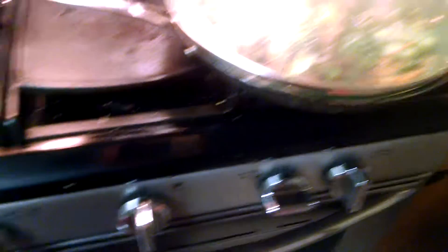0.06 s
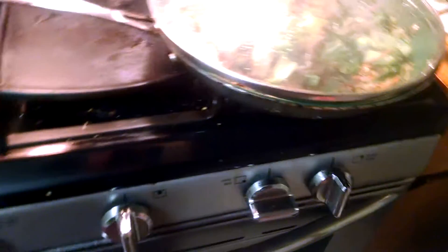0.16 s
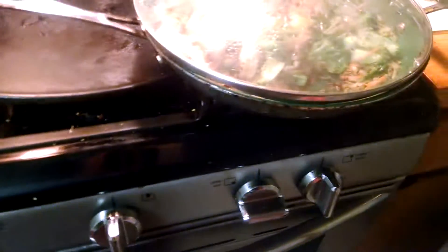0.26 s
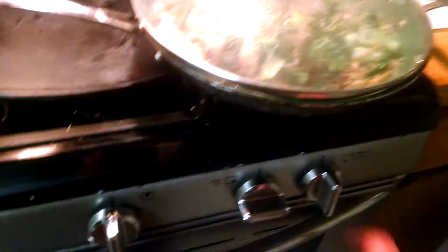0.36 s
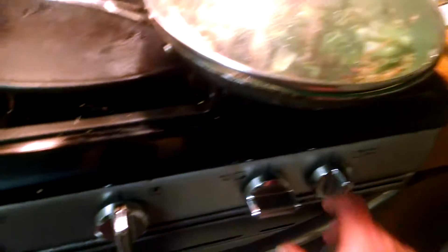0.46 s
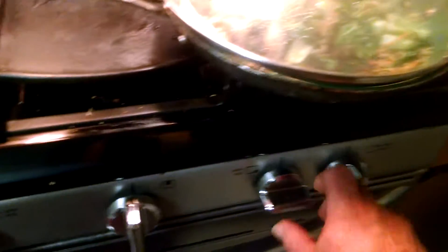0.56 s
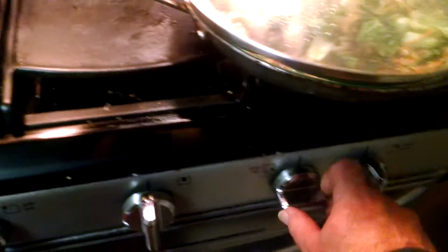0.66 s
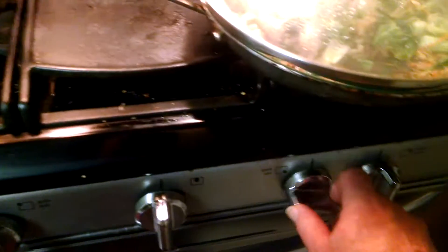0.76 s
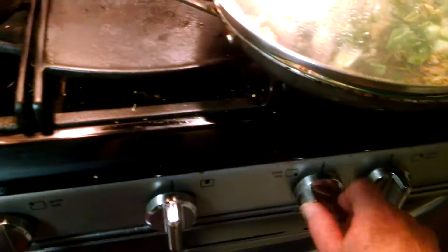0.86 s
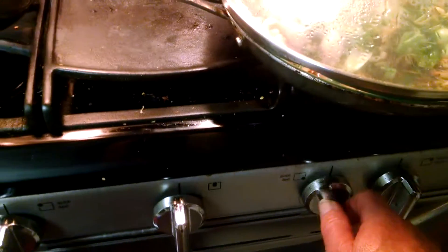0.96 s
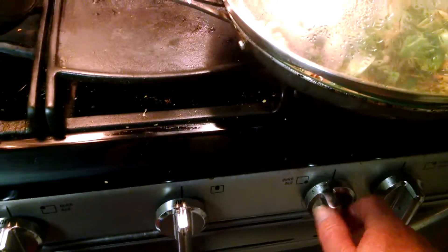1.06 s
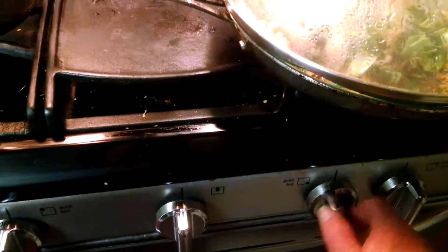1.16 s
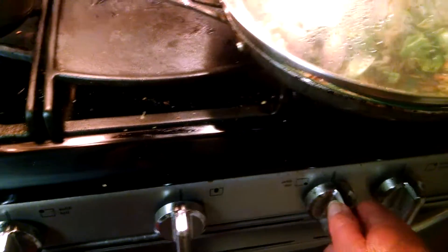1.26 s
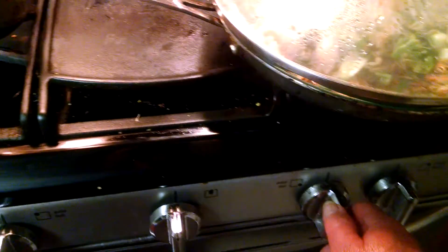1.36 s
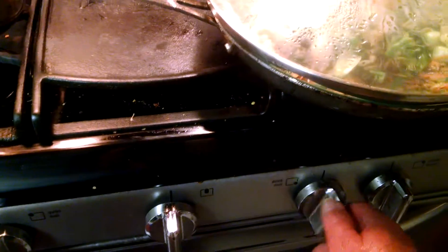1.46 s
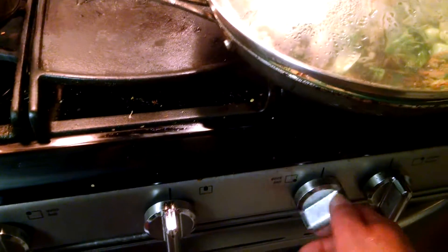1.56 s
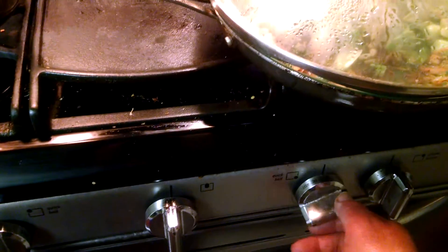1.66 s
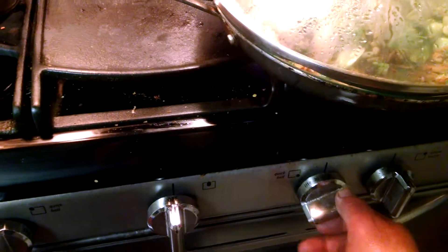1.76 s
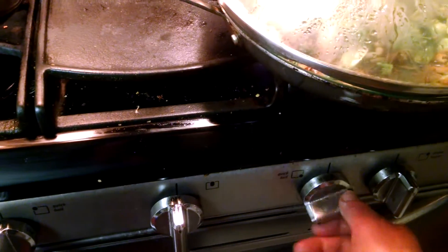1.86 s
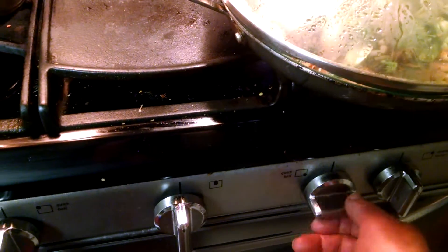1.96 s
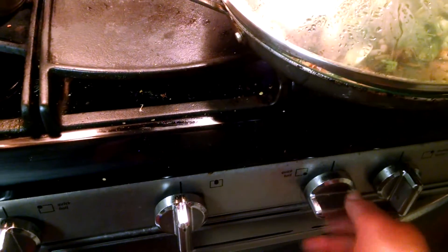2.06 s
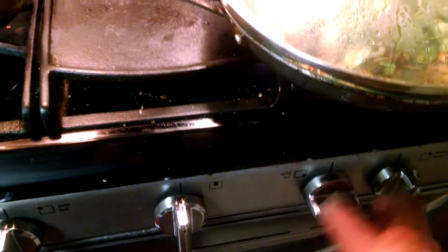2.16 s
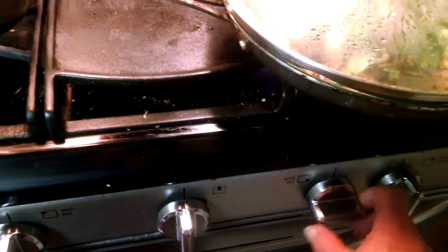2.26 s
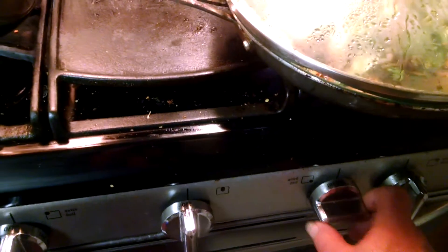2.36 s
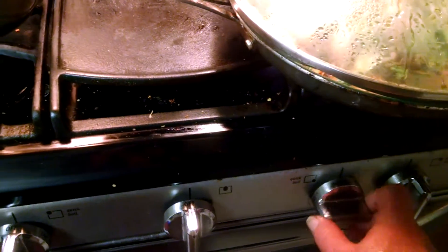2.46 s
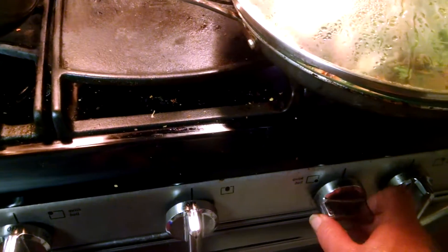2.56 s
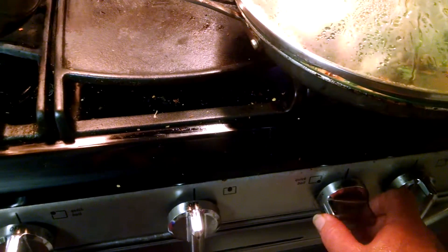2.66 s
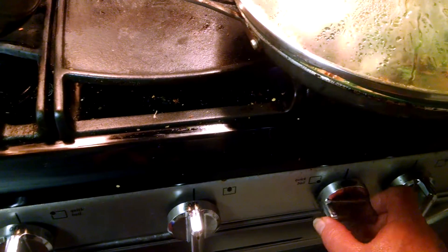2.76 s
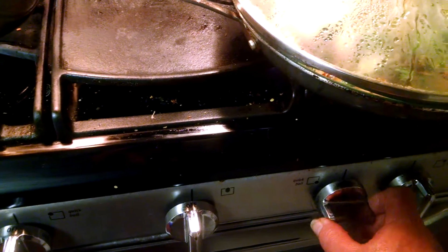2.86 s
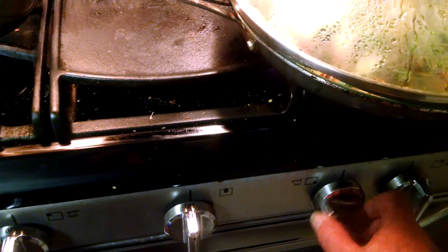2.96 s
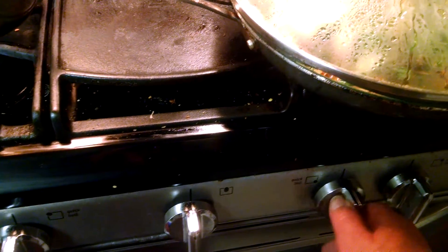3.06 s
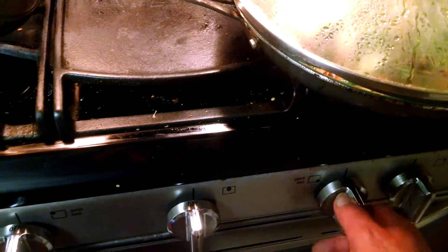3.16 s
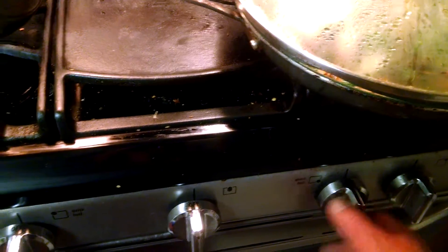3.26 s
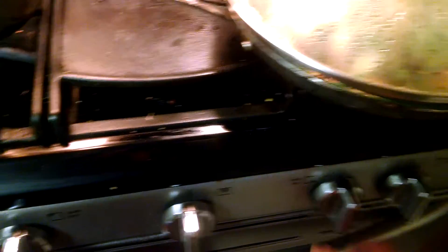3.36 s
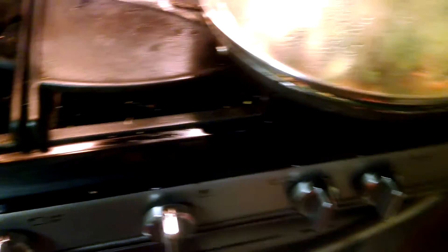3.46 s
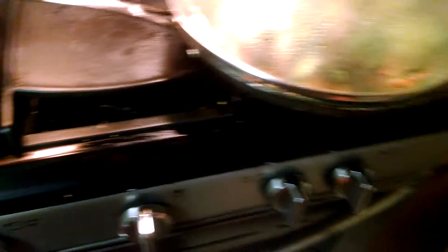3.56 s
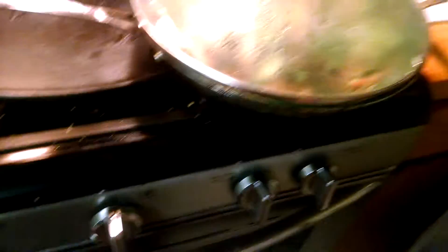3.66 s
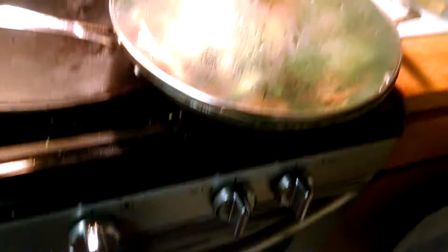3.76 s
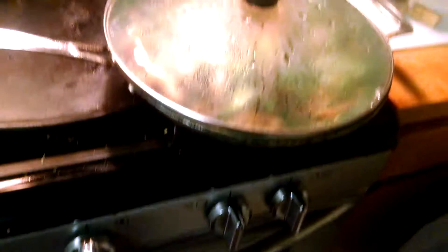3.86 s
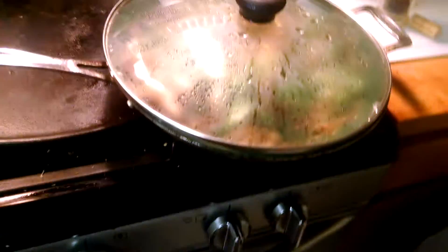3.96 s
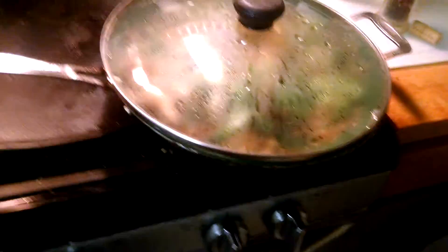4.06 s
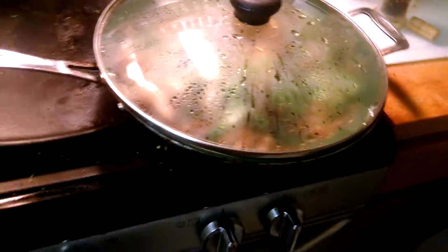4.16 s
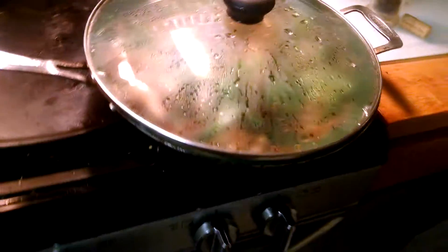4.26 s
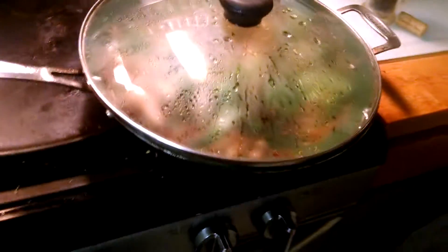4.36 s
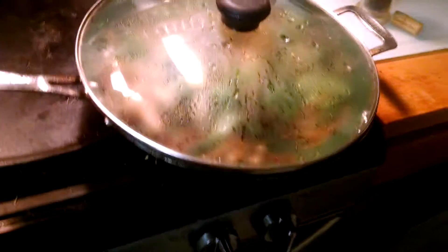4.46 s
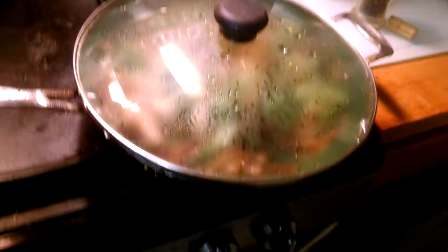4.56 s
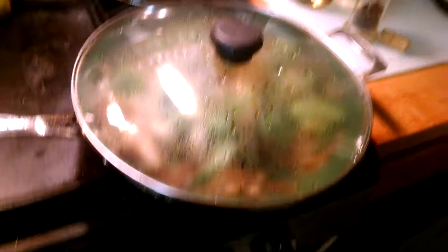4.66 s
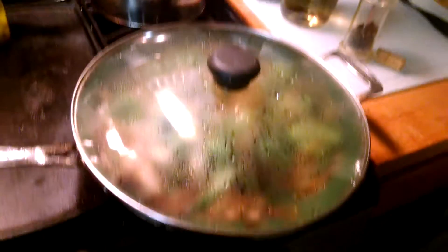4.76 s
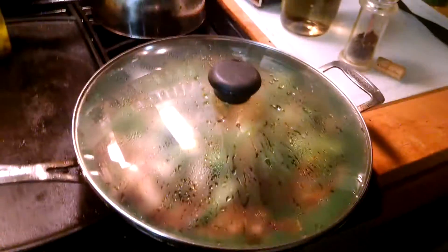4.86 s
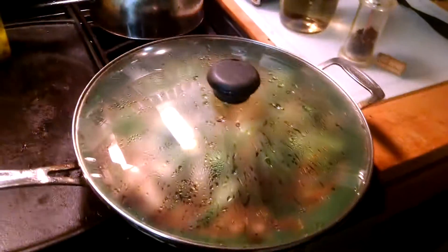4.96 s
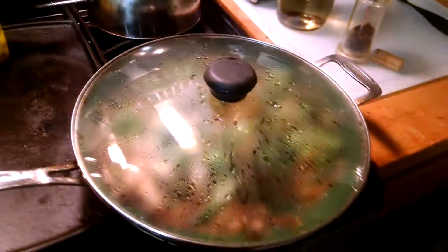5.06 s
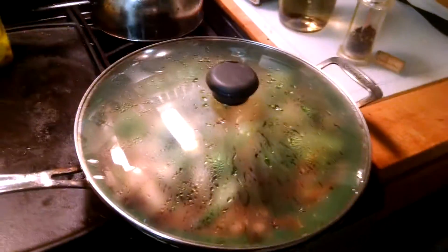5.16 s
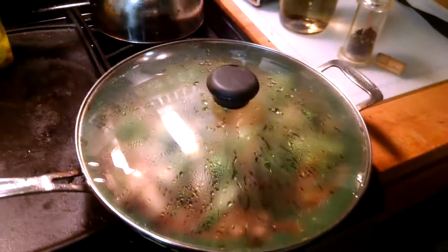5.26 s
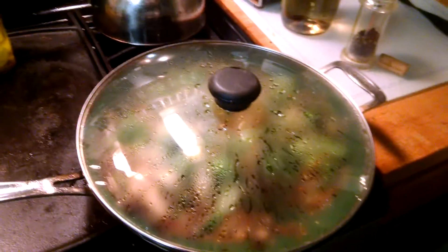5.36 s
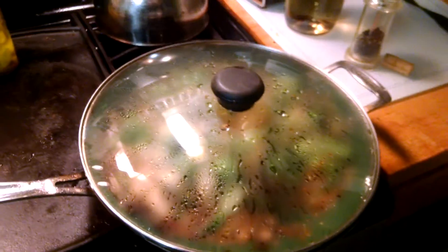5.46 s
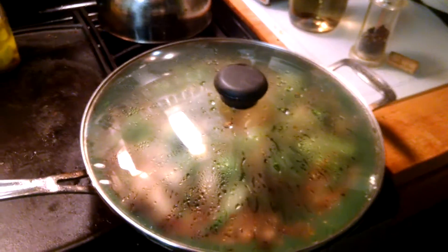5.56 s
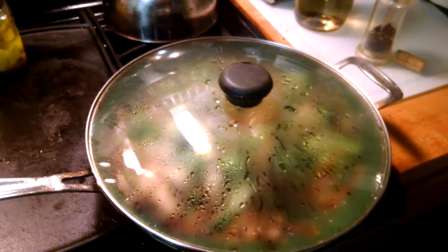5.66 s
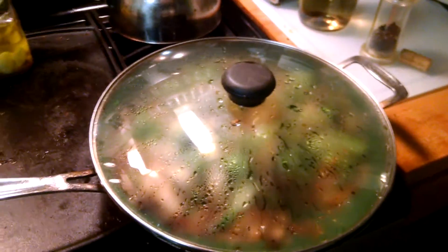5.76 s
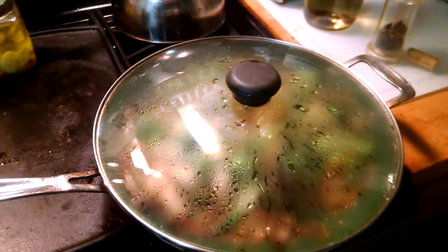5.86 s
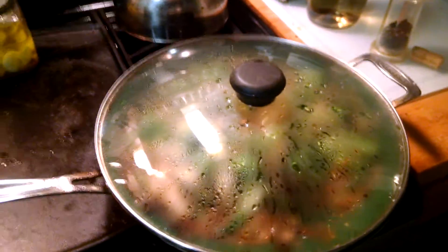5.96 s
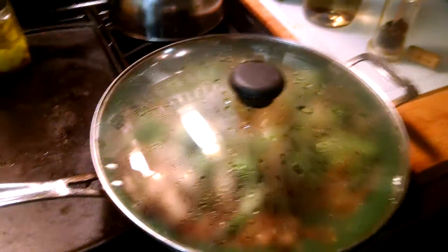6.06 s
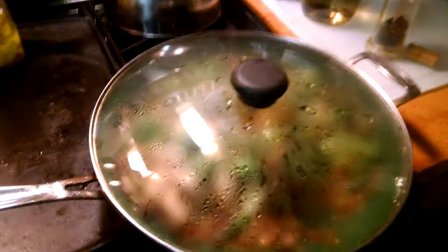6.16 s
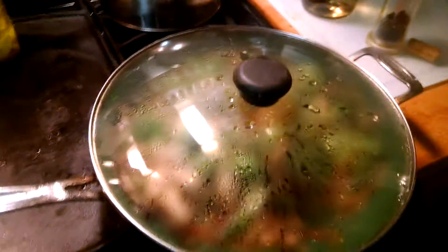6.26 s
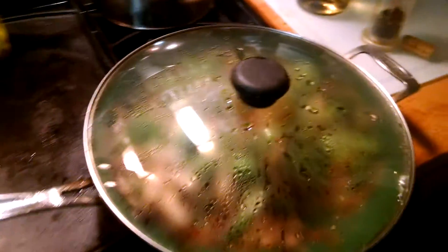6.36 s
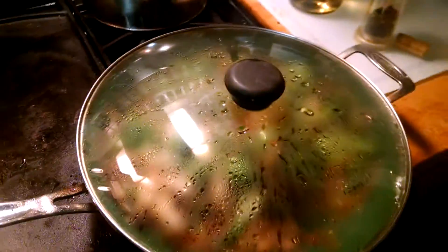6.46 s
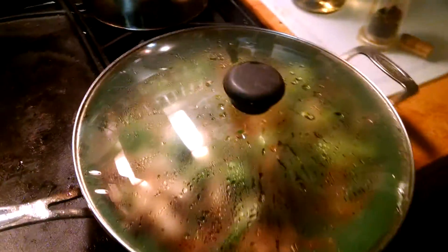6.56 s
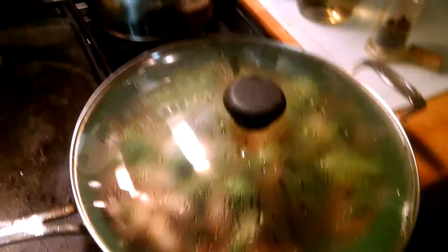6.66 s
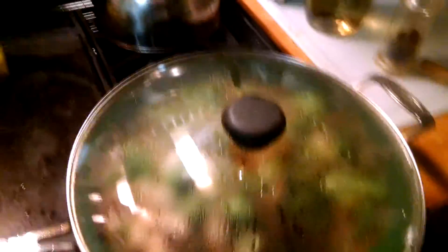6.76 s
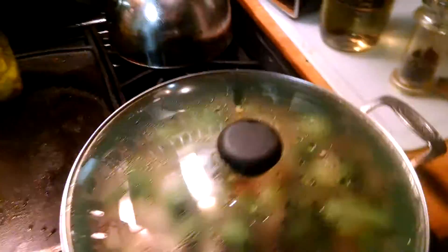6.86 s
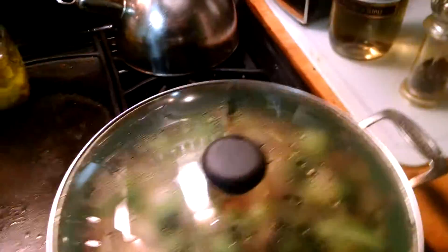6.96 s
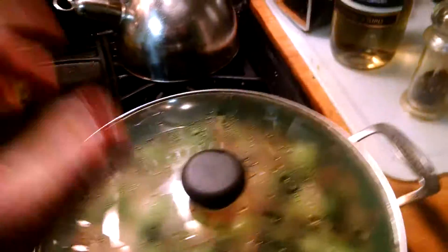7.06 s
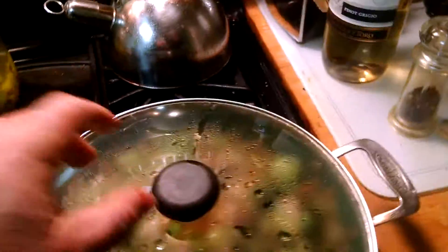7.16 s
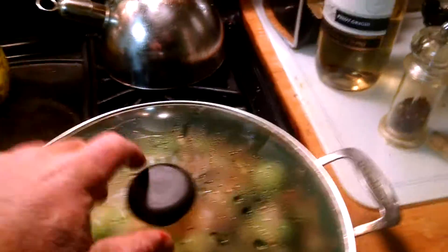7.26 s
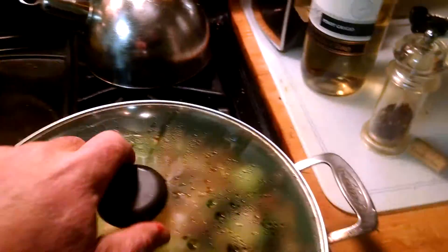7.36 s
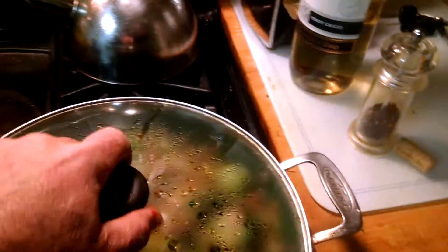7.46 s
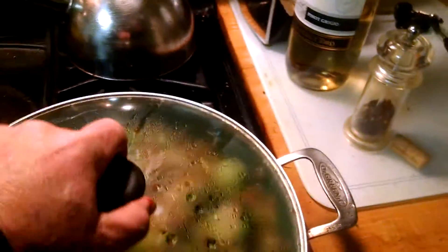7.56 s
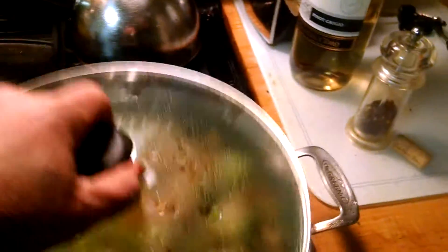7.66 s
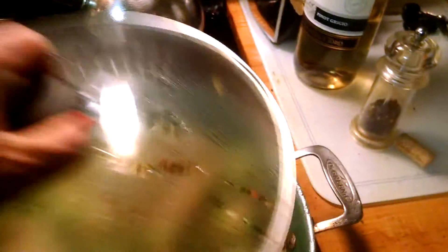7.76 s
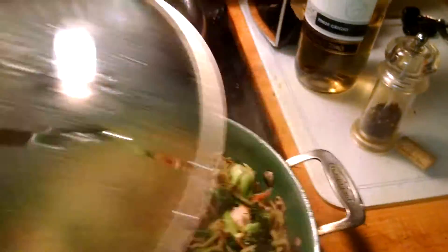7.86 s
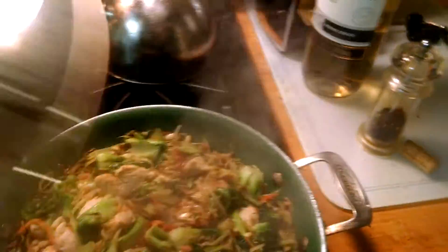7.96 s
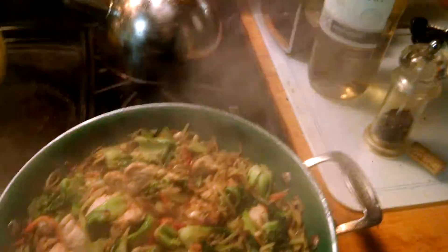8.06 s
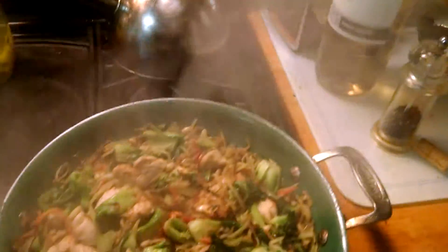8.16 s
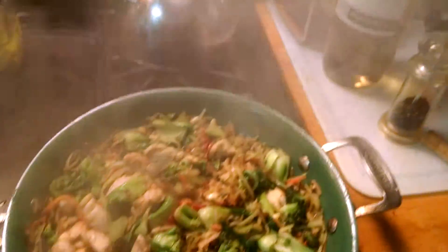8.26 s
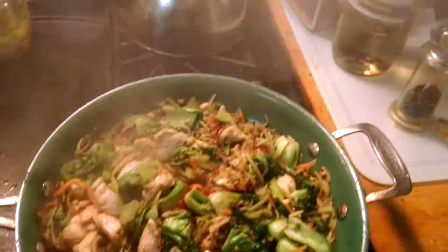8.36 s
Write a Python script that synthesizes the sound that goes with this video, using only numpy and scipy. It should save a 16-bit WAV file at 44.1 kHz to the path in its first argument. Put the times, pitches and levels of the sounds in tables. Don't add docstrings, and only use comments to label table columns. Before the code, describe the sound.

A close, handheld stereo microphone in a kitchen hears vegetables frying under a glass lid: a dense, fine, slightly muffled hiss with small crackles and occasional bright spits. Beneath it a steady low motor hum wavers slightly with soft moving air. At about 2.8 seconds a burner knob gives a hard, dry snap; two more follow at 3.05 and 3.1, very loud and bright with a short rattle. Each makes the background duck abruptly, then creep back over about two seconds. Soft finger bumps touch the microphone at 4.3 and 5.3, with heavier low thumps at 6.0 and a cluster of thuds and dry knocks around 6.7-6.9. Faint knocks and a small ring come at 7.3-7.6. From 7.7 the lid lifts; the sizzle opens wide and bright, its airy resonance rising, with dense sharp spits, a loud one near 8.0 briefly dipping the level, until the end at about 8.4.

```python
import sys
import numpy as np
from scipy import signal
from scipy.fft import rfft, irfft
from scipy.io import wavfile

SR = 44100
rng = np.random.default_rng(int(sys.argv[2]) if len(sys.argv) > 2 else 0)


def to_wav(s):
    ch = np.atleast_2d(s).T
    pcm = np.round(np.clip(ch, -1, 1) * 32767)
    wavfile.write(sys.argv[1], SR, pcm.astype(np.int16))


def decibels_to_gain(level_db):
    exponent = np.asarray(level_db, float) / 20
    return 10 ** exponent


N = 370440


def rms_one(x):
    return x / np.sqrt(np.mean(x ** 2) + 1e-20)


def at_hz(points, hz):
    table = np.array(points)
    return np.interp(np.log(hz + 1), np.log(table[:, 0]), table[:, 1])


def in_time(s, values):
    return np.interp(np.arange(N) / SR, s, values)


def drift(rate_hz):
    r = np.exp(-2 * np.pi * rate_hz * 40 / SR)
    draws = rng.standard_normal(N // 40 + 2002)
    slow = signal.lfilter([1], [1, -2 * r, r * r], draws)[2000:]
    return np.interp(np.arange(N) / 40, np.arange(len(slow)), rms_one(slow))


def ring(clicks, hz, t60_s):
    r = decibels_to_gain(-60 / (t60_s * SR))
    w = 2 * np.pi * min(hz, .45 * SR) / SR
    return signal.lfilter([0, np.sin(w)], [1, -2 * r * np.cos(w), r * r], clicks + 1e-18)


# [f/Hz, width/Hz, level/dB]
HOLLOWS = [(1970, 140, 6), (2950, 310, 6.5)]
# [f/Hz, likeness/0-1]
PORT_LIKENESS = [(30, 0), (150, 0.3), (400, 0.52), (1000, 0.93), (3000, 0.92), (6000, 0.53), (8500, 0.38),
                 (11000, 0.81), (13000, 1), (16000, 0.93)]


def at_ports(pair, spectrum, closer=0):
    hz = np.fft.rfftfreq(N, 1 / SR)
    treble = 1 / (1 + (5500 / (hz + 1)) ** 6)
    unlike = (1 - at_hz(PORT_LIKENESS, hz)) * (1 - closer * treble)
    alike = np.clip(1 - unlike, 0, 1)
    colour_db = at_hz(spectrum, hz)
    for top_hz, width_hz, db in HOLLOWS:
        colour_db = colour_db + db / (1 + (2 * (hz - top_hz) / width_hz) ** 2)
    shared, own = rfft(pair, axis=1) * decibels_to_gain(colour_db)
    left = alike * shared + np.sqrt(1 - alike ** 2) * own
    return rms_one(irfft(np.array([left, shared]), N, axis=1))


# [f/Hz, level/dB rms, wobble/dB, left port extra/dB]
MOTOR_LINES = [(59.1, -47.5, 1.5, -5), (118.2, -53.5, 1, 6.5), (235.3, -47, 0.5, 8.5),
               (359.7, -31.5, 1.3, 4), (411, -46, 0.5, -2), (480, -44, 0.5, -5), (530, -50, 2.5, 0.5),
               (598.6, -51.5, -0.5, -30), (999, -53.5, 3, -1.5), (1160, -73.5, 7, -10)]
# [f/Hz, level/dB per Hz]
AIRFLOW = [(15, -38), (30, -11), (60, -4), (90, -12), (150, -7), (240, 2.5), (320, -0.5), (450, -3.5),
           (600, -8), (800, -8.5), (1200, -16.5), (2200, -24.5), (4000, -19)]
MOTOR_SHADE_DB = [-7.5, -1.7]
# [start t/s, end t/s]
ARM_S = [6.8, 7]


def motor(opening):
    airflow_db = -34
    t = np.arange(N) / SR
    lines = np.zeros((2, N))
    for hz, db, wobble_db, left_db in MOTOR_LINES:
        height = np.sqrt(2) * decibels_to_gain(db + wobble_db * drift(9.9))
        phase = 2 * np.pi * hz * t + .5 * drift(1.08) + rng.uniform(0, 6.08)
        lines += height * np.sin(phase) * [[decibels_to_gain(left_db)], [1]]
    air = decibels_to_gain(airflow_db) * at_ports(rng.standard_normal((2, N)), AIRFLOW) * [[1.4], [1]]
    lid_shade_db, arm_shade_db = MOTOR_SHADE_DB
    shade_db = lid_shade_db * opening + arm_shade_db * in_time(ARM_S, [0, 1]) * (1 - opening)
    return decibels_to_gain(shade_db) * (lines + air)


# [start t/s, end t/s]
GRIP_S = [5.6, 6.3]


def case_rumble():
    level_db, grip_extra_db = -52, 4
    band = signal.butter(2, [12, 45], "band", fs=SR, output="sos")
    rumble = rms_one(signal.sosfilt(band, rng.standard_normal(N)))
    rumble_db = level_db + grip_extra_db * in_time(GRIP_S, [0, 1]) + 5.1 * drift(0.78)
    return decibels_to_gain(rumble_db) * rumble * [[-4.], [1]]


# [t/s, f/Hz, ring/cycles, right port level/dB, left port extra/dB]
THUMPS = [
    (4.28, 40, 7, -22, 1.5),
    (5.3, 40, 2, -18, 10),
    (6.028, 60, 1.5, -11, 12),
    (6.052, 45, 1.7, -8, 11),
    (6.735, 55, 5, -22, 7),
    (6.827, 70, 2, -14, 17),
    (6.86, 50, 6, -21, 11),
]
# [t/s, f/Hz, ring/cycles, level/dB]
KNOCKS = [
    (6.716, 206, 8.4, -12),
    (6.8245, 590, 2, -4.5),
    (6.862, 506, 1.06, -3),
    (6.868, 154, 0.83, -12),
    (7.347, 330, 7.1, -12.5),
    (7.557, 1750, 31, -20.5),
    (7.64, 480, 30, -23.5),
]


def bumps():
    soft_cycles, knock_left_db = 0.21, 5.5
    out = np.zeros((2, N))
    hits = [(*row[:4], -decibels_to_gain(row[4])) for row in THUMPS]
    hits += [(*row, decibels_to_gain(knock_left_db)) for row in KNOCKS]
    for s, hz, cycles, db, left in hits:
        pressed_cycles = np.arange(9000) * hz / SR
        press = np.maximum(1 - np.abs(pressed_cycles / soft_cycles - 1), 0)
        i = round(s * SR)
        out[:, i:i + 9000] += decibels_to_gain(db) * ring(press / press.sum(), hz, cycles / hz) * [[left], [1]]
    return out


# [t/s, low level/dB, middle level/dB, high level/dB, rattle t60/s]
SNAPS = [
    (2.8206, 0, 10.5, 4.5, 0.078),
    (3.0545, 2, 19, 11, 0.059),
    (3.1077, -1, -1, 17, 0.051),
]


def knob():
    out, t = np.zeros((2, N)), np.arange(-200, 9000) / SR
    hz, since_s = np.fft.rfftfreq(len(t), 1 / SR), np.maximum(t, 0)
    for s, low_db, middle_db, high_db, rattle_t60_s in SNAPS:
        noise = rng.standard_normal((3, len(t))) * (t >= 0)
        rattle_rise = 1 - np.exp(-since_s / 0.0016)
        rattle = np.diff(noise[0], prepend=0) * decibels_to_gain(-9.5 - 60 * since_s / rattle_t60_s) * rattle_rise
        crack = noise[0] * decibels_to_gain(-60 * since_s / 0.0058) + 2.8 * (t == 0)
        tail = noise[1:] * decibels_to_gain(-20.5 - 60 * since_s / 0.26) * (1 - np.exp(-since_s / 0.0018))
        burst = crack + rattle + tail
        colour = [(700, low_db - 37), (3200, low_db), (8500, middle_db - 1.5), (14000, high_db + 1)]
        i = round(s * SR) - 200
        out[:, i:i + len(t)] += irfft(rfft(burst, axis=1) * decibels_to_gain(at_hz(colour, hz)), len(t), axis=1)
    return out


# [t/s, opening/0-1]
LID = [
    (0, 0.),
    (7.05, 0.04),
    (7.3, 0.06),
    (7.6, 0.06),
    (7.7, 0.44),
    (7.85, 0.74),
    (8.1, 0.96),
    (8.25, 1.),
    (8.4, 0.76),
]


def lid_opening():
    return np.clip(in_time(*np.transpose(LID)), 0, 1)


# [shut f/Hz, open f/Hz, beside-stove level/dB, above-pan level/dB, swing level/dB]
LID_AIR = [(1492, 1800, -54.5, -47.5, -1), (953, 1196, -50, -49.5, 5.5)]
# [start t/s, end t/s]
ABOVE_S = [2.9, 4.3]


def lid_air(opening):
    above_rise = .025
    out, above = 0, in_time(ABOVE_S, [0, 1])
    for shut_hz, open_hz, beside_db, above_db, swing_db in LID_AIR:
        hz = shut_hz * (1 + above_rise * above) * (1 - opening) + open_hz * opening
        db = beside_db + (above_db - beside_db) * above + swing_db * np.sin(1.3 * np.pi * opening)
        phase = 2 * np.pi * np.cumsum(hz) / SR
        out = out + decibels_to_gain(db) * (drift(76) * np.sin(phase) + drift(62) * np.cos(phase))
    return out


# [t/s, peak level/dB]
SPITS = [(0.4953, -9), (0.7532, -12), (1.1608, -13), (1.2251, -12), (1.255, -14), (1.7983, -13),
         (1.8567, -14), (2.6968, -12), (5.1716, -12), (5.3822, -13), (6.2397, -14), (7.0155, -15),
         (7.6889, -10), (7.7154, -8), (7.8007, -8), (7.8634, -7), (7.9109, -6), (7.9504, -7), (7.9803, -4),
         (7.9878, 0), (8.019, -11), (8.038, -7), (8.081, -4), (8.1325, -7), (8.196, -9), (8.2165, -7),
         (8.2645, -6), (8.325, -8), (8.3755, -5)]


def spits():
    out, t = np.zeros(N), np.arange(200) / SR
    bright = signal.butter(2, [9500, 15800], "band", fs=SR, output="sos")
    for s, db in SPITS:
        noise = rng.standard_normal(200) * t * np.exp(-t / .0004)
        crack = signal.sosfilt(bright, noise) + .15 * noise
        i = round(s * SR)
        out[i:i + 200] += decibels_to_gain(db) * crack / np.abs(crack).max()
    return out


def frying(per_s, spread_db, clump_db, smooth, spectrum, closer=0):
    clumps = decibels_to_gain(clump_db * (drift(30) + 0.62 * drift(8)))
    sizes = decibels_to_gain(spread_db * np.minimum(rng.exponential(1, N), 4)) * rng.choice([-1, 1], N)
    clicks = rms_one(sizes * (rng.random(N) < per_s * clumps / SR))
    blur = rng.standard_normal((2, N)) * clumps ** .5
    mixed = np.sqrt(1 - smooth) * clicks + np.sqrt(smooth) * blur[0]
    return at_ports(np.array([mixed, blur[1]]), spectrum, closer)


# [f/Hz, level/dB per Hz]
OPEN_SPECTRUM = [(400, -19.5), (1000, -11), (2500, -9), (4500, -5), (6500, -1.5), (8500, -8), (11000, 0.5),
                 (13000, -1.5), (15000, 4), (16500, -5.5)]


def bare_frying(opening):
    level_db, leak_db = -18.5, -38
    fry = frying(800, spread_db=5.5, clump_db=1.5, smooth=0.84, spectrum=OPEN_SPECTRUM, closer=0.41)
    return decibels_to_gain(level_db) * (opening + decibels_to_gain(leak_db)) * fry


# [f/Hz, level/dB per Hz]
MUFFLED_SPECTRUM = [(500, -8.5), (1200, -8.5), (2500, -6.5), (4500, -6.5), (6000, -4), (8000, -5),
                    (10000, -2.5), (12000, 0.5), (14000, 5.5), (15500, 2)]
# [t/s, level/dB]
VIGOUR = [(0, -24.5), (1.2, -26), (1.8, -25.5), (2.8, -27.5), (3.4, -25), (4, -25.5), (5.2, -26),
          (5.7, -26.5), (7.05, -26.5), (7.6, -27.5), (7.7, -20.5), (7.85, -26.5), (8.4, -25)]


def covered_frying():
    fry = frying(5000, spread_db=5.0, clump_db=2.0, smooth=0.76, spectrum=MUFFLED_SPECTRUM)
    return decibels_to_gain(in_time(*np.transpose(VIGOUR))) * fry


def scene():
    opening = lid_opening()
    background = motor(opening) + case_rumble() + bumps() + knob()
    pan = lid_air(opening) + spits() + bare_frying(opening) + covered_frying()
    return background + pan


def top_cut(x):
    return signal.sosfilt(signal.butter(12, 15880, fs=SR, output="sos"), x)


# [overload t/s, turn-down level/dB, attack/s]
DUCKS = [
    (2.8215, -19.5, .0015),
    (3.055, -20, .002),
    (3.108, -20, .002),
    (7.9893, -14, .001),
]


def record(dry):
    port_lag_s, recover_db_per_s = 17.3 / 44100, 10
    hz, t = np.fft.rfftfreq(N, 1 / SR), np.arange(N) / SR
    direct = 0.61 / (1 + 1j * hz / 1500) / (1 + (hz / 1900) ** 4)
    delayed = 0.39 + .5 * hz ** 2 / (hz ** 2 + 1500 ** 2)
    delayed = delayed * np.exp(-2j * np.pi * hz * port_lag_s)
    left = irfft(rfft(dry[0]) * (direct - delayed), N)
    gain_db = np.zeros(N)
    for s, depth_db, attack_s in DUCKS:
        after_s = np.maximum(t - s, 0)
        duck_db = (depth_db + recover_db_per_s * after_s) * (1 - np.exp(-after_s / attack_s))
        gain_db = np.minimum(gain_db, duck_db)
    loud = np.clip(np.array([left, dry[1]]) * decibels_to_gain(gain_db), -1, 1)
    low_pass = signal.cheby2(20, 50, 15720, fs=SR, output="sos")
    mix = np.clip(signal.sosfilt(low_pass, loud), -1, 1)
    return top_cut(mix)


dry = scene()
out = record(dry)
to_wav(out)
```